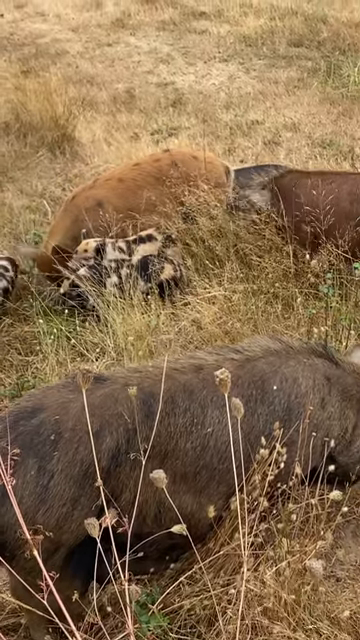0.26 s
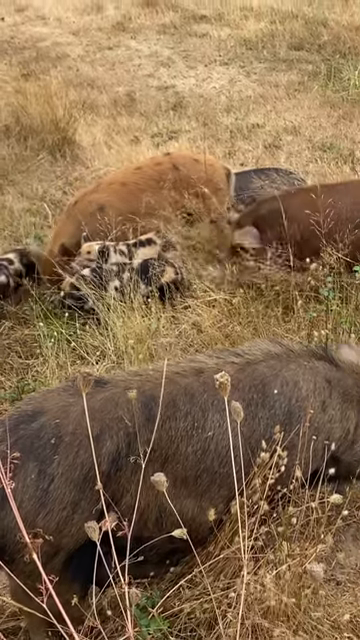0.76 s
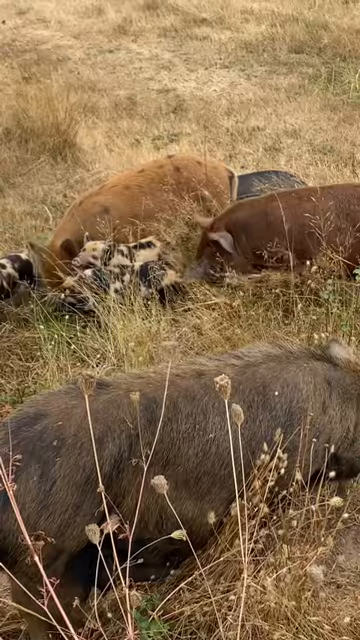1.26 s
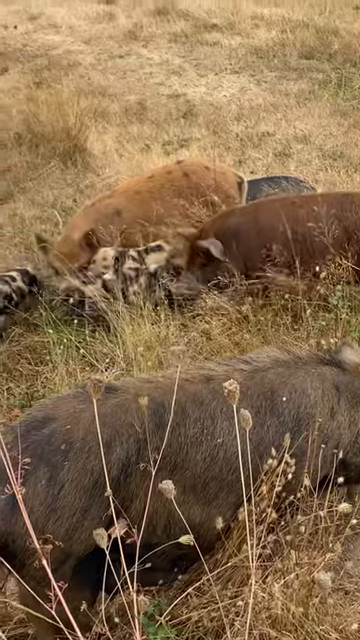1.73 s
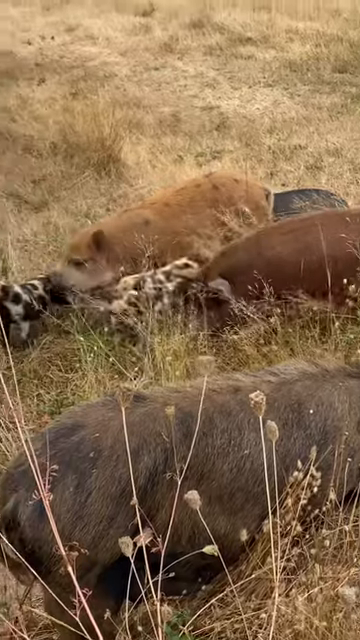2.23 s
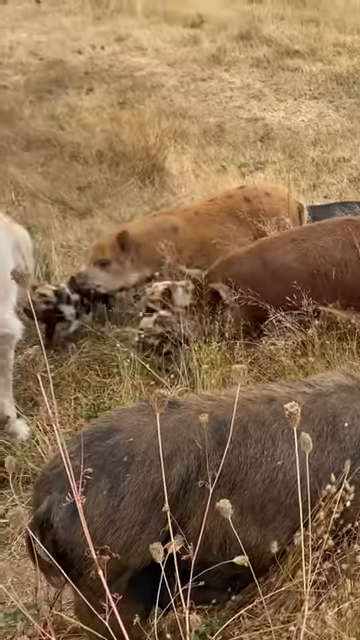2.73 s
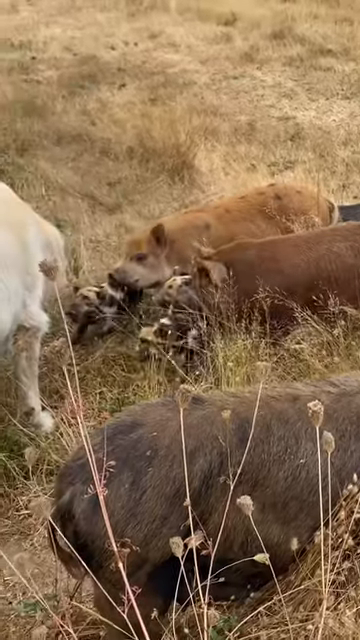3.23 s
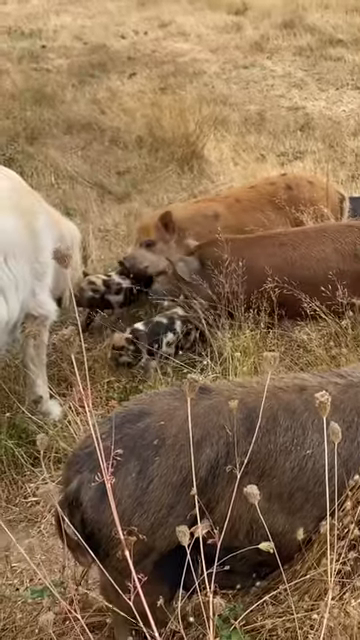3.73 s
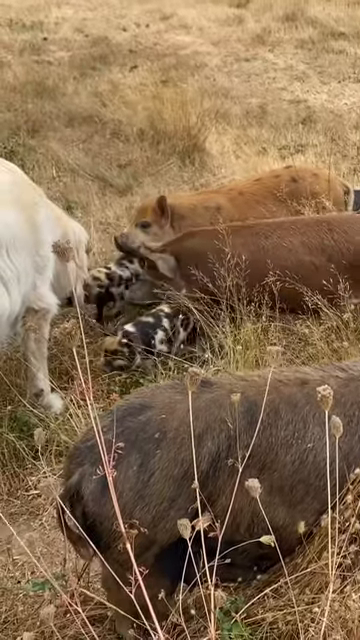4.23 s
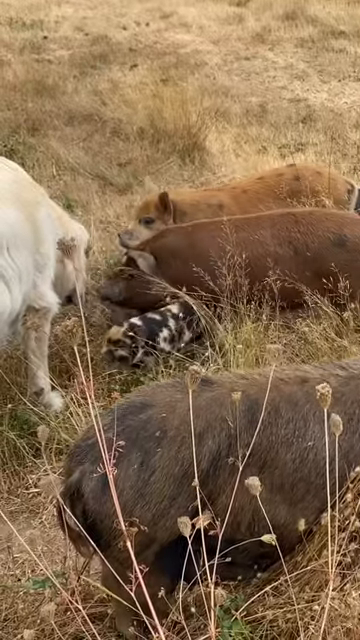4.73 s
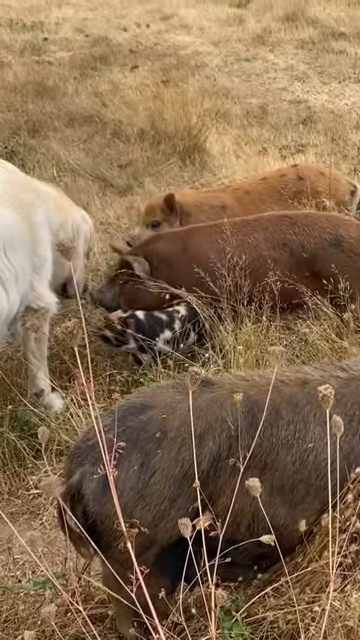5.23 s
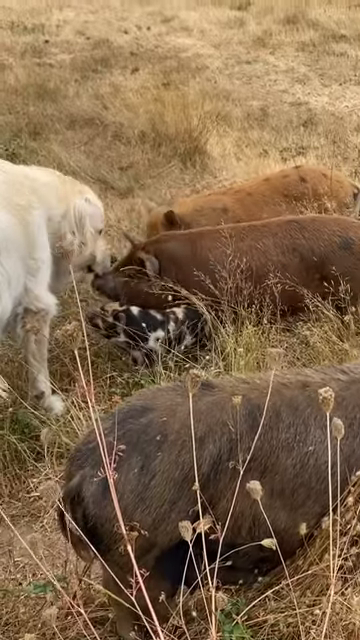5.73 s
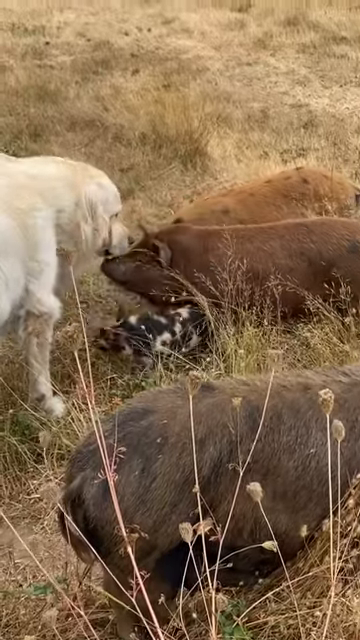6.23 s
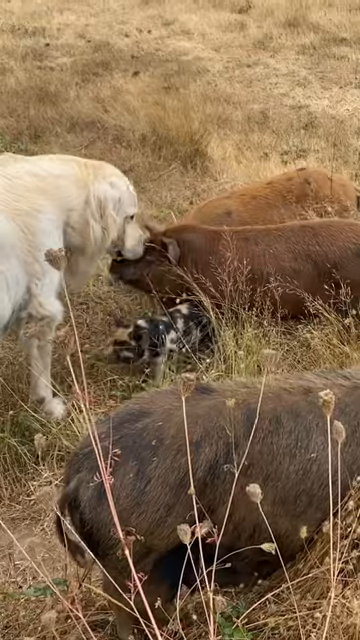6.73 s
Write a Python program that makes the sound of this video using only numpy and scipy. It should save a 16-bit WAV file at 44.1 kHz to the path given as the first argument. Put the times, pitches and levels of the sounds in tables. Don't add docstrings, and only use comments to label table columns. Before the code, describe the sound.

Soft low pig grunts, crackling straw and faint wind puffs in a dry pasture, ending with a sudden creaky louder call and a soft hum.

```python
import sys
import numpy as np
from scipy import signal
from scipy.fft import rfft, irfft, next_fast_len
from scipy.io import wavfile
from scipy.ndimage import uniform_filter1d, map_coordinates

SR = 44100
rng = np.random.default_rng(int(sys.argv[2]) if len(sys.argv) > 2 else 0)


def waveform_to_disk(signal):
    frames = np.transpose(np.atleast_2d(signal))
    scaled = np.clip(frames, -1, 1) * 32767
    samples = np.round(scaled).astype(np.int16)
    wavfile.write(sys.argv[1], SR, samples)


def to_linear_factor(level_db):
    exponent = np.asarray(level_db, float) / 20
    return 10 ** exponent


N = 308259


def unit(x):
    return x / np.sqrt(np.mean(x ** 2) + 1e-20)


def filtered(x, response):
    m = next_fast_len(x.shape[-1] + 2048)
    return irfft(rfft(x, m) * response(np.fft.rfftfreq(m, 1 / SR)), m)[..., :x.shape[-1]]


def ports(x, lag_ms, pan_db=0):
    side = np.array([[.5], [-.5]])
    return to_linear_factor(side * pan_db) * filtered(x, lambda hz: np.exp(-2j * np.pi * hz * (1 + side * lag_ms) / 1000))


def add(out, s, x):
    i = round((s - 1 / 1000) * SR)
    out[:, i:i + x.shape[1]] += x[:, :N - i]


def curves(rows):
    s, *cols = np.transpose(rows)
    t = np.arange(s[0], s[-1], 1 / SR)
    return [t] + [np.interp(t, s, c) for c in cols]


def resonance(x, hz, *widths_hz):
    turn = np.exp(2j * np.pi * np.cumsum(hz + 0 * x) / SR)
    x = x / turn
    for width_hz in widths_hz:
        x = signal.lfilter([1], [1, -np.exp(-np.pi * width_hz / SR)], x)
    return unit((turn * x).real)


def spurts(pulses, fall_s):
    return signal.lfilter([1], [1, -np.exp(-1 / (fall_s * SR))], pulses)


def wobble(rate):
    return map_coordinates(rng.standard_normal(int(N * rate / SR) + 4), [np.arange(N) * rate / SR])


def rush(spectrum, alike, lag_ms, patchy_db, grains_db):
    z = signal.stft(rng.standard_normal((3, N)), nperseg=512)[2]
    field = uniform_filter1d(rng.standard_normal(z.shape[1:]), size=6, axis=0)
    field = uniform_filter1d(field, size=14, axis=1)
    noise = signal.istft(z * to_linear_factor(patchy_db * unit(field)), nperseg=512)[1][:, :N]
    noise = noise * to_linear_factor(grains_db * wobble(500))
    f, db = np.transpose(spectrum)
    noise = filtered(noise, lambda hz: to_linear_factor(np.interp(np.log(hz + 1), np.log(f), db)))
    share = np.clip(alike, 0, 1)
    return unit(np.sqrt(share) * ports(noise[0], lag_ms) + np.sqrt(1 - share) * noise[1:])


def fold_pulses(t, strong_s, rate, jitter=.035, scatter_db=1.5):
    k = np.arange(-12, 13)
    luck = rng.standard_normal((len(k), 2))
    pulse_s = strong_s - .003 + (k + jitter * luck[:, 0] * (k != 0)) / rate
    at = np.round((pulse_s - t[0]) * SR).astype(int)
    inside = (at >= 0) & (at < len(t))
    size = to_linear_factor(scatter_db * np.where(k == 0, 1, luck[:, 1]))
    return np.bincount(at[inside], size[inside], len(t))


def snout_tone(folds, done, snout_hz, glide, whine):
    nose_hz = snout_hz * (1 + glide * (done - .6) - 0.23 * (done - .5) ** 2)
    whine = np.clip(whine, 0, 1)
    snout = np.sqrt(1 - whine) * resonance(folds, nose_hz, 79, 200, 260, 430)
    snout += np.sqrt(2 * whine) * np.sin(2 * np.pi * np.cumsum(nose_hz) / SR)
    return snout + 0.088 * resonance(folds, 836, 200, 300)


def mouth_tone(folds, done, mouth_db):
    mouth_hz = 1277 + 36.5 * max(mouth_db + 70, 0)
    mouth = resonance(folds, mouth_hz * (1.03 - 0.027 * done), 170, 400, 660)
    mouth += 0.5 * resonance(folds, 1000 - 300 * done, 200, 320, 450)
    mouth += 0.39 * resonance(folds, 1.243 * mouth_hz, 180, 460)
    mouth += 0.2 * resonance(folds, 1.53 * mouth_hz, 600, 1200)
    return unit(mouth)


def swell(done, peak, edges_db):
    rise = edges_db[0] * (1 - done / peak) ** 2
    fall = edges_db[1] * ((done - peak) / (1 - peak)) ** 2
    return np.where(done < peak, rise, fall)


# t/s, length/s, chest level/dB, snout level/dB, mouth level/dB
GRUNT_LEVELS = [(0.295, 0.065, -45.5, -60.5, -69.5), (0.842, 0.11, -51, -58.5, -71),
                (1.291, 0.11, -42.5, -54.5, -67), (1.56, 0.065, -52.5, -63.5, -79),
                (2.438, 0.095, -45, -61, -54.5), (2.645, 0.087, -46.5, -59, -57),
                (2.737, 0.072, -58, -51.5, -71.5), (3.074, 0.086, -49.5, -54.5, -74.5),
                (3.14, 0.089, -43, -63, -57), (3.358, 0.072, -56, -55, -79),
                (3.645, 0.097, -48, -63, -76.5), (4.575, 0.082, -47.5, -56, -68),
                (4.853, 0.077, -56, -58.5, -69.5), (5.084, 0.065, -53.5, -57, -73),
                (5.415, 0.11, -58.5, -62.5, -70.5)]
# t/s of the strongest pulse, pulse rate/Hz, pig
GRUNT_FOLDS = [(0.332, 78, "sow"), (0.899, 60.4, "sow"), (1.337, 92, "boar"), (1.593, 52, "sow"),
               (2.4739, 86, "hog"), (2.673, 78, "piglet"), (2.76, 94, "piglet"), (3.108, 71, "shoat"),
               (3.1641, 78, "red"), (3.405, 65, "gilt"), (3.7, 76, "red"), (4.619, 82, "red"),
               (4.907, 64.5, "runt"), (5.099, 64.5, "runt"), (5.501, 61, "runt")]
PIG_VOICES = {"sow": (485, -.18, .1, -0.19, 1.8, 1.2), "boar": (610, -.12, .3, -0.17, 2, 2.2),
              "gilt": (500, .22, .9, .65, -.4, 1.2), "piglet": (520, -.18, .1, 0.95, 4, 2.5),
              "red": (498, -.18, .1, 0.45, 0, .8), "runt": (505, -.1, .05, 0.35, 4.3, 1.2),
              "shoat": (505, .26, .45, 0.65, -0.4, 1.2), "hog": (560, -.45, .05, -0.1, -1, 1.3)}
CHEST_PEAK, MOUTH_PEAK = 0.77, 0.36
CHEST_EDGES_DB, SNOUT_EDGES_DB, MOUTH_EDGES_DB = (31, 14.5), (13, 26), (17, 30)


def grunts(rough=.6):
    out = np.zeros((2, N))
    for levels, (strong_s, rate, pig) in zip(GRUNT_LEVELS, GRUNT_FOLDS):
        s, length, chest_db, snout_db, mouth_db = levels
        snout_hz, glide, whine, lag_ms, pan_db, rasp = PIG_VOICES[pig]
        t = np.arange(s, s + length, 1 / SR)
        done, strong = (t - s) / length, (strong_s - s) / length
        pulses = fold_pulses(t, strong_s, rate)
        breath = rng.standard_normal(SR // 5)[:len(t)]
        folds = unit(pulses) + rough * unit((unit(spurts(pulses, .012)) + .5) * breath)
        chest = resonance(folds, 235 - 80 * done, 89, 160, 330)
        snout = snout_tone(folds, done, snout_hz, glide, whine)
        spit = unit((unit(spurts(pulses, .004)) + .25 * rasp) * breath)
        mouth = mouth_tone(unit(pulses) + rasp * spit, done, mouth_db)
        voice = to_linear_factor(chest_db - swell(done, CHEST_PEAK, CHEST_EDGES_DB)) * chest
        voice += to_linear_factor(snout_db + 5.0 - swell(done, strong, SNOUT_EDGES_DB)) * snout
        voice += to_linear_factor(mouth_db + 3.5 - swell(done, min(strong, MOUTH_PEAK), MOUTH_EDGES_DB)) * mouth
        voice = voice * signal.windows.tukey(len(t), .15)
        voice = filtered(voice, lambda hz: (hz / (hz - 75j)) ** 2)
        add(out, t[0], ports(voice, lag_ms, pan_db))
    return out


# f/Hz, width/Hz, level/dB
THROAT_PEAKS = [(455, 94, -11), (847, 53, -15.5), (622, 32, -14), (1366, 144, -5), (1900, 126, 0),
                (3010, 340, -6), (5350, 140, -12.5)]
# f/Hz, width/Hz
NASAL_POCKETS = [(1070, 270), (2400, 570), (4200, 1300)]


def throat(hz):
    peaks = 0
    for k, (c, w, db) in enumerate(THROAT_PEAKS):
        peaks = peaks + (-1) ** k * to_linear_factor(db) * 1j * hz * w / (c * c - hz * hz + 1j * hz * w)
    for c, w in NASAL_POCKETS:
        peaks = peaks * (c * c - hz * hz + .06j * hz * w) / (c * c - hz * hz + 1j * hz * w)
    return peaks


# t/s, pitch f/Hz, hum level/dB, open-mouth level/dB
LOUD_CALL = [
    (6.3, 198, -58.5, -50),
    (6.35, 220, -43.5, -50),
    (6.375, 192, -41, -50),
    (6.397, 207, -33, -38),
    (6.408, 205, -29.5, -40),
    (6.436, 201, -30.5, -42.5),
    (6.466, 189, -32.5, -52),
    (6.482, 187, -39, -80),
    (6.503, 187, -66, -95),
]
# t/s, pitch f/Hz, hum level/dB, mouth level/dB
AFTER_HUM = [
    (6.568, 222, -57, -85),
    (6.583, 213, -41, -74),
    (6.6, 208, -38.5, -67),
    (6.63, 207, -39, -68),
    (6.655, 201, -43.5, -81),
    (6.673, 200, -66, -90),
]
# t/s, chest level/dB, mouth level/dB
SLAMS = [
    (6.3, -37, -60),
    (6.3106, -28.5, -40),
    (6.323, -24, -21),
    (6.3389, -23, -32),
    (6.3418, -36, -25),
    (6.3533, -16.5, -18),
    (6.3682, -21, -23),
    (6.3731, -20.5, -18),
    (6.386, -15, -22.5),
]
# multiple, level/dB
HUM_OVERTONES = [(2, -36), (3, -33), (4, -31)]
VOICED_S = 6.4005
BEAT_SOFT_HZ, AIR_HZ = 1700, 2110


def call(rows, rough=.33):
    t, hz, hum_db, mouth_db = curves(rows)
    voiced = t >= VOICED_S
    cycles = np.cumsum(hz * voiced) / SR
    thuds, slams = np.zeros((2, len(t)))
    for s, chest_db, db in SLAMS:
        now = (t >= s) & (t < s + 1 / SR)
        thuds[now], slams[now] = to_linear_factor(chest_db), to_linear_factor(db + 16.5)
    beats = np.diff(np.ceil(cycles), prepend=0) * to_linear_factor(mouth_db + 41.5)
    unsettled = np.clip(1 - (t - VOICED_S) / .06, 0, 1)
    beats *= 1 - unsettled * .85 * (np.ceil(cycles) % 3 == 0)
    folds = slams + filtered(beats, lambda f: 1.08 / (1 + 1j * f / BEAT_SOFT_HZ))
    air = slams + .2 * beats
    leak = rough * spurts(air, 0.0046) * rng.standard_normal(len(t)) / 3
    folds += filtered(leak, lambda f: 1 / (1 + 1j * (f / AIR_HZ)) ** 3 * 2.26)
    tones = [to_linear_factor(db) * np.sin(2 * np.pi * k * (cycles - .12)) for k, db in [(1, 0)] + HUM_OVERTONES]
    hum = np.sqrt(2) * sum(tones) * np.clip((t - VOICED_S) / 0.0045, 0, 1)
    if slams.any():
        chest = resonance(thuds / to_linear_factor(hum_db), hz, 44, 200)
        hum += 1.31 * chest * np.clip((VOICED_S - t) / 0.0025, 0, 1)
    return ports(to_linear_factor(hum_db) * hum, 0.36, -3) + ports(filtered(folds, throat), 0.052, 2.0)


# t/s, peak level/dB, f/Hz, t60/ms, place
STRUCK_NOTES = [(2.6325, -35.5, 630, 25, "left"), (2.6695, -43, 1800, 32, "right"),
                (2.6625, -49, 1450, 35, "far left"), (2.5, -51, 650, 45, "left"),
                (3.1615, -45.5, 1850, 28, "near"), (3.1735, -45.5, 1900, 31, "near"),
                (3.2015, -53.5, 1850, 27, "near"), (1.3335, -40.5, 520, 35, "ahead"),
                (1.3235, -47, 550, 49, "ahead"), (1.3015, -52, 585, 52, "ahead"),
                (1.3135, -44.5, 560, 45, "ahead"), (1.345, -45, 540, 60, "ahead"),
                (1.2, -61, 1250, 28, "aside"), (1.4115, -57, 2000, 30, "aside"),
                (6.073, -61, 1500, 44, "front"), (3.874, -54.5, 250, 41, "front"),
                (3.874, -68, 880, 20, "front"), (2.018, -40.5, 141, 97, "left"),
                (3.9, -54.5, 250, 48, "left"), (4.11, -57, 264, 48, "left"), (.925, -52, 237, 29, "ahead"),
                (3.205, -41.5, 150, 60, "aside"), (2.9, -53, 950, 30, "aside"),
                (2.4585, -48, 900, 30, "aside"), (.878, -47.5, 477, 55, "ahead"),
                (.89, -50, 498, 52, "ahead")]
NOTE_PLACES = {"left": (.68, 8), "right": (.04, -4), "far left": (-.26, 4), "near": (-.1, 3.5),
               "ahead": (-.13, 0), "aside": (-.31, -1), "front": (0, 0)}
RING_RISE_CYCLES, RING_FUZZ, RING_HOLDS = .5, .3, 1.4


def rings():
    out, t = np.zeros((2, N)), np.arange(SR // 10) / SR
    for s, db, hz, t60_ms, place in STRUCK_NOTES:
        fuzz = RING_FUZZ * resonance(rng.standard_normal(len(t)), hz, 0.25 * hz, 0.78 * hz)
        rise = 1 - np.exp(-t * hz / RING_RISE_CYCLES)
        shape = to_linear_factor(db + 3.0 - 60 * (1000 * t / t60_ms) ** RING_HOLDS) * rise
        add(out, s, ports(shape * (np.sin(2 * np.pi * hz * t) + fuzz), *NOTE_PLACES[place]))
    return out


# t/s, peak level/dB, f/Hz, t60/ms, left lag/ms
HOOF_KNOCKS = [(1.4115, -49, 1240, 57, -0.4), (1.596, -57, 1430, 33, -0.19), (2.128, -52.5, 500, 25, 0.39),
               (2.149, -50, 560, 35, -0.57), (2.1904, -42.5, 494, 22, 0.86), (2.228, -48, 8000, 152, 0),
               (2.2788, -30.5, 545, 29, 0.98), (2.2965, -43.5, 576, 134, 0.58), (2.29, -50.5, 8600, 760, 0),
               (2.5348, -49.5, 960, 21, -0.45), (2.6335, -40, 584, 34, 0.9), (2.653, -44, 1440, 35, -0.27),
               (2.682, -47.5, 8600, 150, 0), (4.99, -65, 880, 140, 0.24), (6.071, -63.5, 2230, 66, 0),
               (6.081, -58, 1220, 70, 0.03)]
# t/s, peak level/dB, f/Hz, left lag/ms
STALK_BREAKS = [(0.184, -60, 11900, 0.59), (1.977, -49, 10600, 0.72), (2.6707, -43, 1670, 0.14),
                (3.4645, -41, 11500, 0.64), (3.4661, -42, 11000, 0.72), (3.4912, -47, 10800, 0.25),
                (3.4965, -50, 10300, .25), (3.512, -51, 11000, 0.26), (3.587, -51, 11000, .1),
                (3.5915, -40.5, 10700, 0.1), (3.751, -59, 12626, 0.21), (4.252, -63, 966, 0.013),
                (4.2843, -42.5, 3100, -0.066), (4.707, -63, 1460, 0.3), (4.809, -56.5, 7150, 0.33),
                (2.1898, -55, 5000, 0.75), (4.285, -42, 6600, -0.083), (5.852, -52, 6060, -0.6)]
STALK_T60_MS = 12
# t/s, peak level/dB, f/Hz, t60/ms, left lag/ms
MORE_KNOCKS = [(2.1895, -49, 2300, 9, .3), (2.1895, -50, 9000, 6, .3), (2.2752, -46, 600, 30, 1),
               (2.2797, -50, 3800, 10, .8), (2.232, -56, 6500, 200, 0), (2.462, -60, 3600, 220, 0),
               (2.447, -56, 3300, 25, -.2), (2.664, -60, 1500, 30, .5), (1.279, -54, 480, 25, -.2),
               (2.758, -59, 3000, 20, .5), (6.072, -66, 3000, 60, 0), (3.162, -59, 3200, 20, .6),
               (2.6335, -53, 1700, 14, .68), (2.447, -50, 1000, 25, -.2), (2.685, -57, 1950, 200, .3),
               (4.7062, -57, 1600, 10, 0), (2.4468, -50, 1950, 22, -.2), (2.485, -58, 3000, 60, 0),
               (4.284, -52, 1600, 10, 0), (1.305, -66, 1750, 300, -.13), (2.655, -62, 2900, 250, .04)]
SWISH_MS, SWISH_RISE = 145, .07


def snaps(rows):
    out, t = np.zeros((2, N)), np.arange(SR // 10) / SR
    for s, db, hz, t60_ms, lag_ms in rows:
        rise_s = SWISH_RISE * t60_ms / 1000 if t60_ms > SWISH_MS else 1 / (4 * hz)
        burst = resonance(rng.standard_normal(len(t)), hz, 0.23 * hz, 2.0 * hz)
        ring = np.sin(2 * np.pi * hz * t) * np.exp(-hz * t / 6)
        ring += 1.5 * np.sign(rng.standard_normal(len(t))) * np.exp(-t / 0.00018)
        shape = to_linear_factor(db - 60000 * t / t60_ms) * (1 - np.exp(-t / rise_s))
        snap = shape * (2.45 * ring + 1.03 * burst)
        snap = filtered(snap, lambda f: (f / (f - .5j * hz)) ** 3)
        add(out, s - .0004, ports(snap, lag_ms))
    return out


# t/s, level/dB
HERD_STIR = [(0, -65.5), (.2, -78), (.3, -68.5), (.52, -66.5), (.58, -64), (.72, -63), (.8, -66.5),
             (1.05, -65.5), (1.25, -64), (1.4, -63), (2.21, -66), (2.26, -59.5), (2.79, -63), (2.84, -70),
             (3.5, -60.5), (3.92, -67), (4.28, -65.5), (5.05, -68.5), (5.3, -65.5), (5.6, -65.5),
             (6.99, -70)]
# t/s, length/s, shuffle rise/dB, grass rise/dB
THATCH_STEPS = [(0, 0.048, 2, -2), (0.316, 0.16, 6, -1), (0.578, 0.055, 6.5, 1), (1.237, 0.1, 9.5, 1),
                (1.794, 0.39, 5, -2.5), (2.261, 0.089, 14, -0.5), (2.483, 0.36, 15, -1.7),
                (2.719, 0.14, 18, -2.5), (3.465, 0.052, 5.5, -0.5), (3.7, 0.053, 13.5, 4.5),
                (4.26, 0.16, -0.5, 4.5), (4.64, 0.17, 4, 3), (5.3, 0.097, 3.5, 5), (5.45, 0.23, 10, -1.1),
                (6.076, 0.4, 2, 1.5), (6.536, 0.52, 5, 1.7), (0.81, 0.14, 5, -3), (0.447, .1, -0.5, 0),
                (1.046, 0.068, 3.5, 1.5), (1.95, .12, 0, 2), (3.476, 0.11, 1, 1.5), (4.06, 0.15, 0.5, 1.5),
                (3.9, 0.084, 0.5, 1), (4.697, 0.084, -1.5, 0.5)]
# f/Hz, level/dB per Hz
GRASS_COLOUR = [(700, -17.5), (1500, -8.5), (2500, -5), (4000, -2), (6500, 2.5), (8500, -5), (10000, -12),
                (16000, -22)]
# f/Hz, level/dB per Hz
FIZZ_COLOUR = [(6000, -39), (8500, -10.5), (10000, 1.5), (11500, 0), (13500, 0), (15500, -1.5)]
# f/Hz, level/dB per Hz
SHUFFLE_COLOUR = [(100, -16), (200, 0), (400, 3.5), (600, -5), (900, -8), (1500, -15.5), (2500, -21),
                  (5000, -50)]
FIZZ_DB, SHUFFLE_DB = 5, -73


def field():
    t = np.arange(N) / SR
    steps = np.array([np.exp(-(2 * (t - s) / length) ** 2) for s, length, *_ in THATCH_STEPS])
    shuffle_db, lift_db = np.transpose(THATCH_STEPS)[2:] @ steps
    stir_db = np.interp(t, *np.transpose(HERD_STIR)) + lift_db + 1.0 * wobble(19) + 1.08 * wobble(34)
    grass = to_linear_factor(stir_db + 2.0) * rush(GRASS_COLOUR, 0.32, -0.2504, 1.9, 1.27)
    fizz = to_linear_factor(stir_db + FIZZ_DB) * rush(FIZZ_COLOUR, 0.78, -0.264, 1.36, 1.4)
    shuffle_db = SHUFFLE_DB + shuffle_db + 2.27 * wobble(14)
    return grass + fizz + to_linear_factor(shuffle_db) * rush(SHUFFLE_COLOUR, 0.4, 0.72, 4.6, 1.0)


# t/s, peak level/dB, f/Hz, flutter level/dB
WIND_PUFFS = [(0.222, -33.5, 77, -16.5), (0.739, -49.5, 56.3, -13), (1.656, -44.5, 68, -38),
              (1.741, -50.5, 60.4, -29), (1.928, -41.5, 60.5, -25), (2.006, -70, 107, -6),
              (2.028, -27.5, 81.7, -14.5), (2.109, -50, 54.6, -9), (3.388, -47.5, 61, -26),
              (3.986, -42.5, 69, -18.5), (4.114, -39, 82, -22), (4.183, -43.5, 75, -15),
              (4.352, -49, 84, 1), (4.385, -45, 60.7, -36), (4.58, -49, 73.4, -16),
              (4.837, -45.5, 97, -9.5), (4.86, -39.5, 56, -14), (5.077, -47.5, 74.5, -28),
              (5.507, -45, 81, -9.5), (5.675, -37.5, 80, -18), (5.718, -40.5, 68, -23),
              (5.754, -48, 63, -29), (5.804, -52, 94, -23), (5.909, -47, 95, -2), (5.944, -47, 68.5, -3.5),
              (5.977, -52, 83.5, -25), (5.999, -43, 105, -11), (6.255, -43.5, 116, -18),
              (6.844, -46.5, 63.5, -34), (6.872, -47.5, 50.5, -33)]
# t/s, peak level/dB, f/Hz, flutter level/dB
WEAK_EDDIES = [(.62, -55, 60, -20), (.9, -58, 60, -25), (2.02, -40, 150, -6), (2.3, -54, 65, -15),
               (2.77, -56, 55, -20), (3.82, -54, 70, -20), (3.885, -56, 80, -10), (3.6, -55, 60, -25),
               (4.5, -56, 70, -12), (6.555, -55, 80, -20), (6.62, -56, 56, -30)]
# t/s, left lag/ms
WIND_LAG = [(0, -1.96), (2.1, -1.05), (2.6, 1.8), (4, 1.7), (4.3, 0.72), (7, 0.61)]
PUFF_CYCLES = 0.97


def puffs(rows):
    out, t = np.zeros((2, N)), np.arange(-.1, .1, 1 / SR)
    for s, db, hz, flutter_db in rows:
        length = PUFF_CYCLES / hz
        skew = np.where(t > 0, 1.6, .9)
        gust = np.exp(-np.log(2) * (2 * t / (length * skew)) ** 2)
        push = np.cos(2 * np.pi * (hz * t * (1.1 - 3 * t) + rng.uniform()))
        flutter = resonance(rng.standard_normal(len(t)), 182, 150, 140)
        gust = gust + 0.51 * to_linear_factor(flutter_db) * np.exp(-(t / 0.043) ** 2)
        lag_ms = np.interp(s, *np.transpose(WIND_LAG))
        puff = to_linear_factor(db) * gust * (push + to_linear_factor(flutter_db) * flutter)
        add(out, s + t[0], ports(puff, lag_ms, -2 * lag_ms))
    return out


# t/s, level/dB
BREEZE_LEVEL = [(0, -81), (0.33, -59.5), (0.7, -64), (1.05, -67), (1.22, -75), (1.4, -60), (1.55, -61),
                (1.7, -55), (2.0, -58.5), (2.99, -70), (3.32, -59.5), (3.66, -59), (3.99, -55), (4.6, -64),
                (4.99, -60.5), (5.32, -68), (5.65, -61), (6.2, -57.5), (6.99, -53)]
# f/Hz, level/dB per Hz
WIND_COLOUR = [(20, -37), (40, -1), (65, -3), (110, -11), (200, -17), (400, -34), (2000, -104)]


def breeze():
    level_db = np.interp(np.arange(N) / SR, *np.transpose(BREEZE_LEVEL)) + 2.0 * wobble(13)
    return to_linear_factor(level_db) * rush(WIND_COLOUR, 0.54, 0.36, 4.8, 0)


# t/s when it stops, f/Hz, level/dB
FAR_INSECT = (6.4, 3300, -78.5)


def insect():
    end_s, hz, db = FAR_INSECT
    song = resonance(rng.standard_normal(N), hz, 120, 180) * (np.arange(N) < end_s * SR)
    return to_linear_factor(db) * ports(song, 500 / hz)


# f/Hz, level/dB per Hz
HISS_COLOUR = [(800, -14), (2000, -4), (3300, 0), (6000, -3), (9000, -15)]


def faint_hiss():
    return to_linear_factor(-79.5) * rush(HISS_COLOUR, .5, 0, 1, 0)


def scene():
    stalks = [(s, db, hz, STALK_T60_MS, lag_ms) for s, db, hz, lag_ms in STALK_BREAKS]
    out = grunts()
    add(out, LOUD_CALL[0][0], call(LOUD_CALL))
    add(out, AFTER_HUM[0][0], call(AFTER_HUM))
    out += rings() + snaps(HOOF_KNOCKS + stalks) + snaps(MORE_KNOCKS)
    out += field() + puffs(WIND_PUFFS) + puffs(WEAK_EDDIES) + breeze()
    return out + insect() + faint_hiss()


# f/Hz, width/Hz, share of time
WEAK_BANDS = [(9250, 560, .68), (8700, 500, .2), (5400, 300, .07), (2850, 200, .03), (13950, 400, .3),
              (12450, 300, .4)]


def dropouts(x):
    for c, w, share in WEAK_BANDS:
        band = filtered(x, lambda hz: np.exp(-(2 * (hz - c) / w) ** 8))
        power = uniform_filter1d(band ** 2, size=1024)
        weak = 1. * (power < np.quantile(power, share))
        x = x - band * uniform_filter1d(weak, size=512)
    return x


# f/Hz, width/Hz, level/dB
SUM_GAPS = [(13150, 1150, -45), (16400, 1200, -60)]
# f/Hz, width/Hz, level/dB
DIFFERENCE_GAPS = [(10900, 1400, -68), (16200, 1400, -66)]


def thinned(dry):
    def gaps(table):
        return lambda hz: (hz < 16400) * to_linear_factor(sum(db * np.exp(-(2 * (hz - c) / w) ** 6) for c, w, db in table))

    mid = dropouts(filtered(dry[0] + dry[1], gaps(SUM_GAPS)) / 2)
    side = filtered(dry[0] - dry[1], gaps(DIFFERENCE_GAPS)) / 2
    return np.array([mid + side, mid - side])


def low_pass(x):
    return signal.sosfilt(signal.butter(12, 16480, fs=SR, output="sos"), x)


def record(dry):
    mix = thinned(dry)
    return low_pass(mix)


dry = scene()
out = record(dry)
waveform_to_disk(out)
```